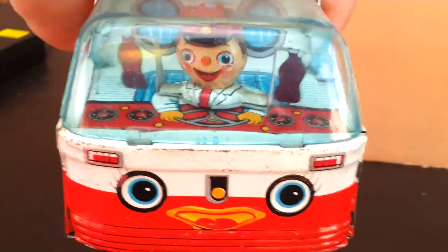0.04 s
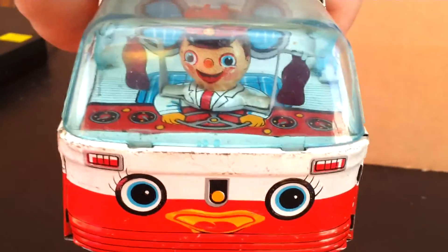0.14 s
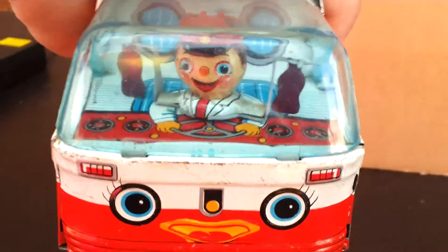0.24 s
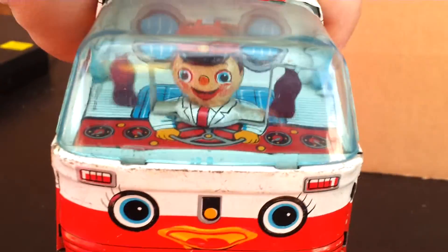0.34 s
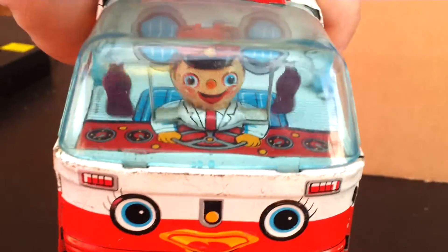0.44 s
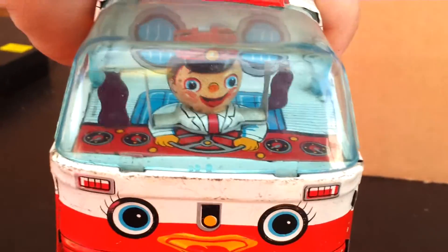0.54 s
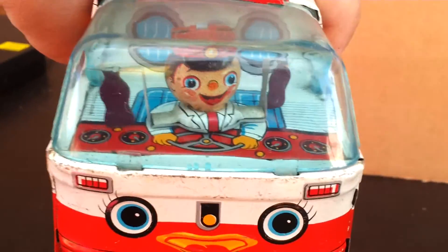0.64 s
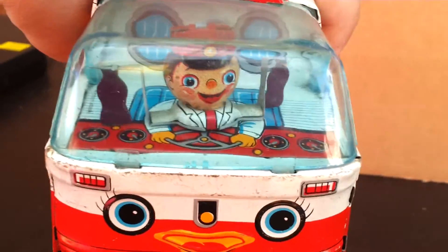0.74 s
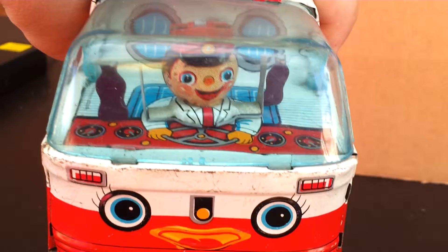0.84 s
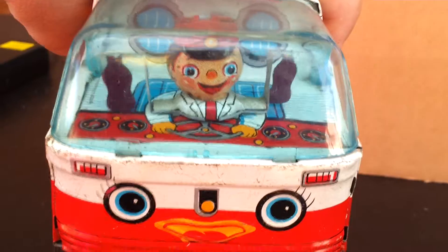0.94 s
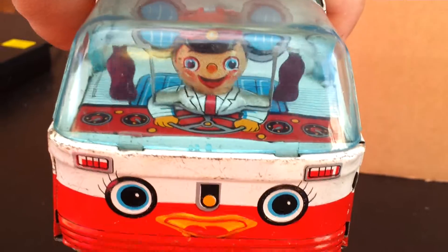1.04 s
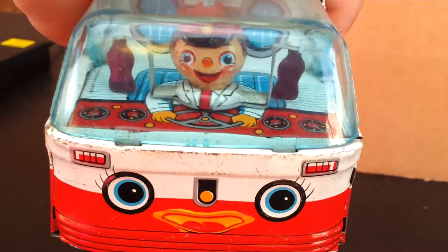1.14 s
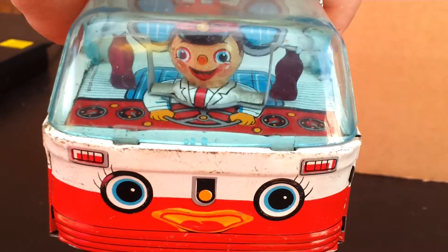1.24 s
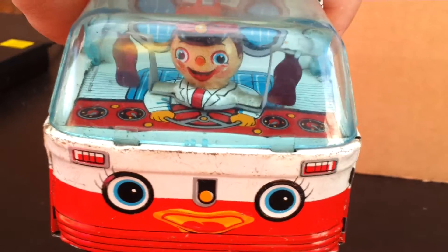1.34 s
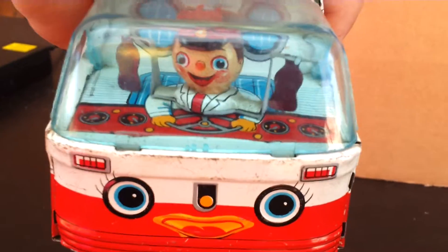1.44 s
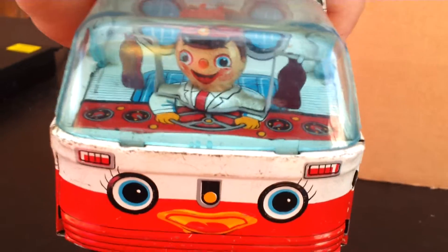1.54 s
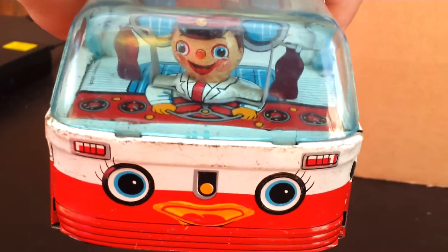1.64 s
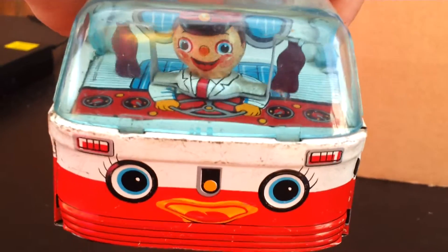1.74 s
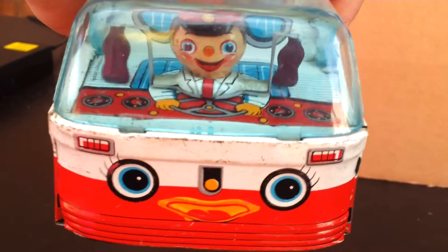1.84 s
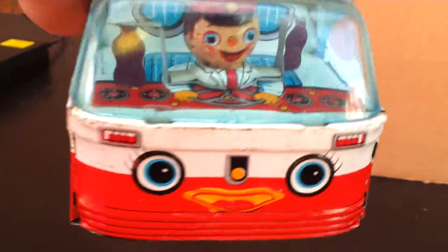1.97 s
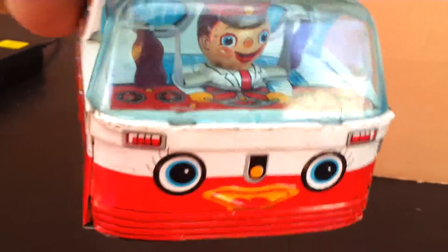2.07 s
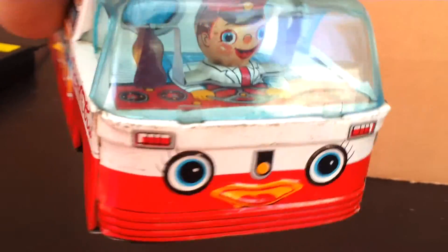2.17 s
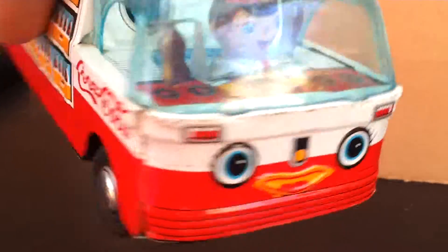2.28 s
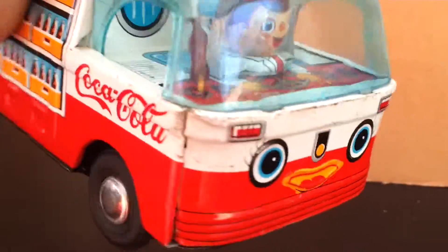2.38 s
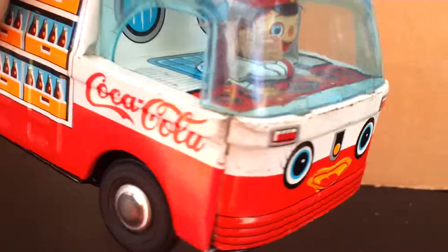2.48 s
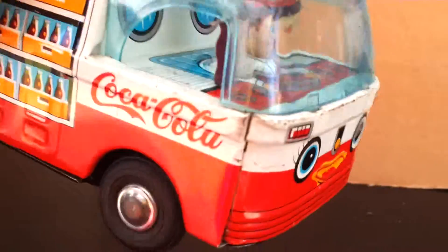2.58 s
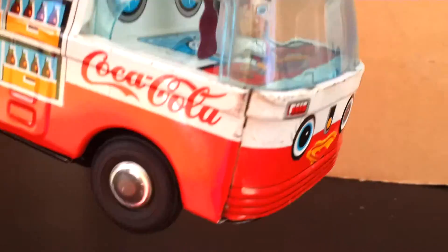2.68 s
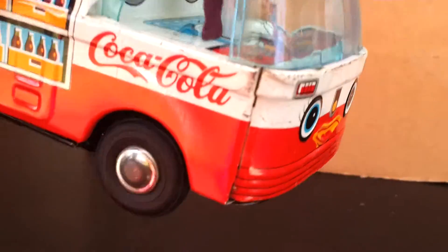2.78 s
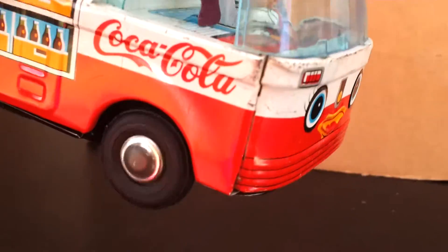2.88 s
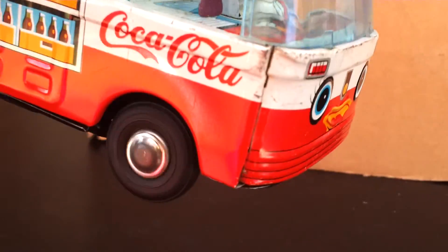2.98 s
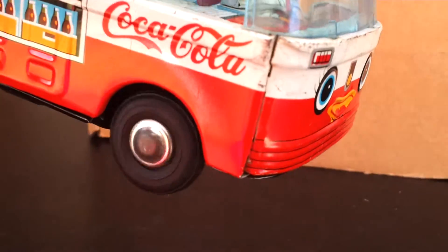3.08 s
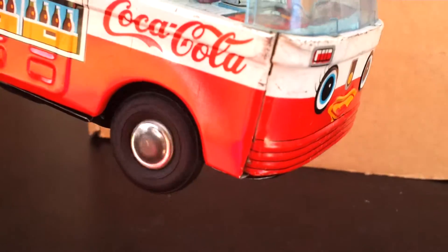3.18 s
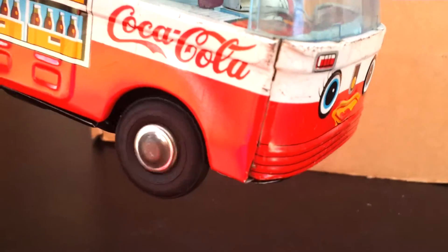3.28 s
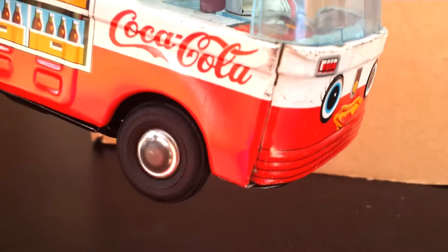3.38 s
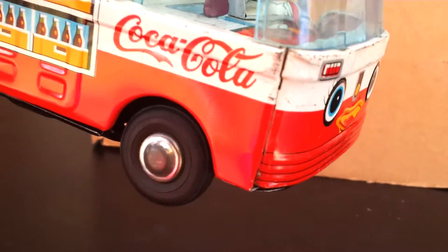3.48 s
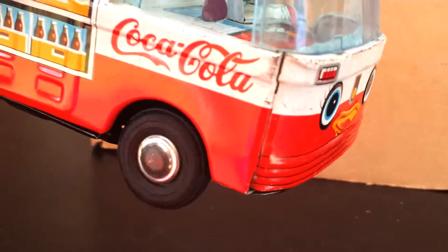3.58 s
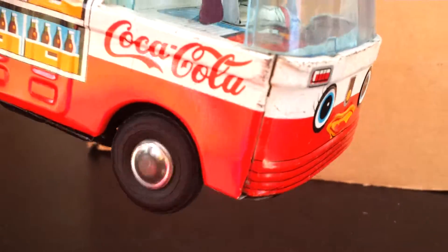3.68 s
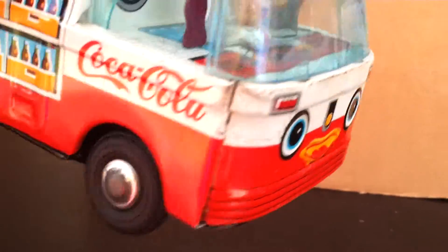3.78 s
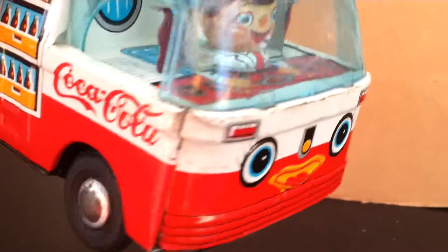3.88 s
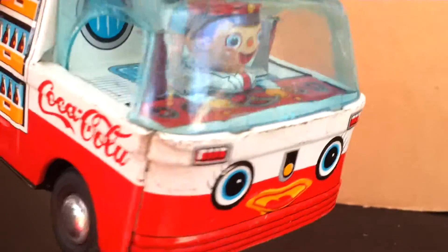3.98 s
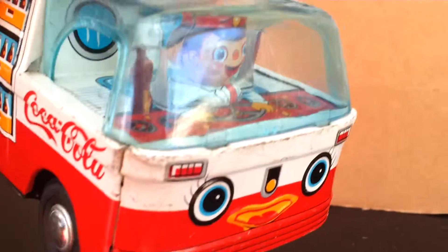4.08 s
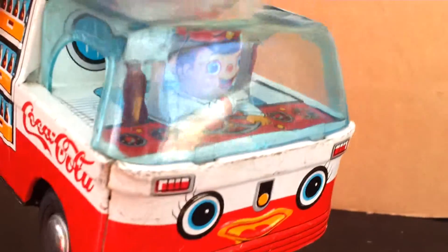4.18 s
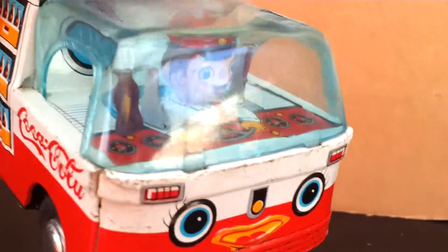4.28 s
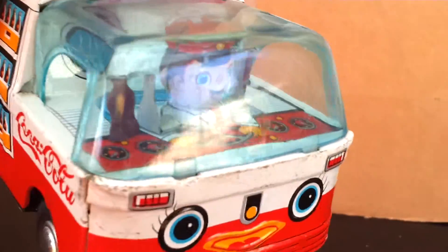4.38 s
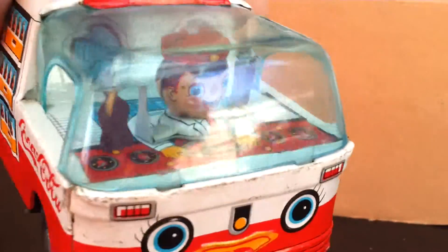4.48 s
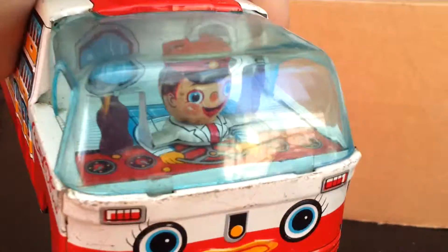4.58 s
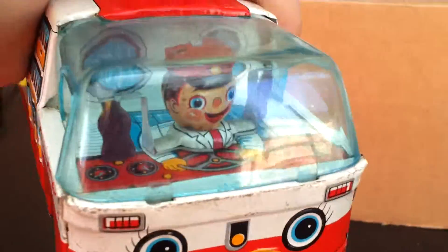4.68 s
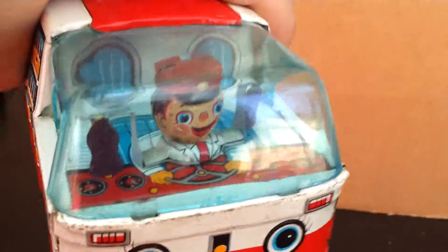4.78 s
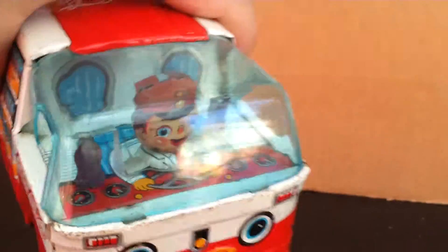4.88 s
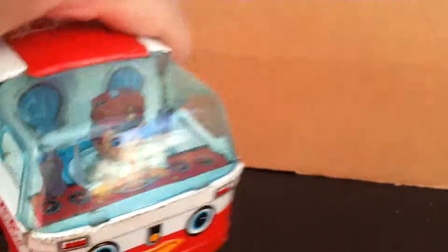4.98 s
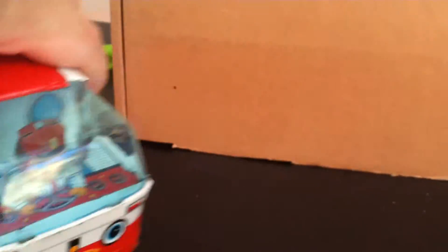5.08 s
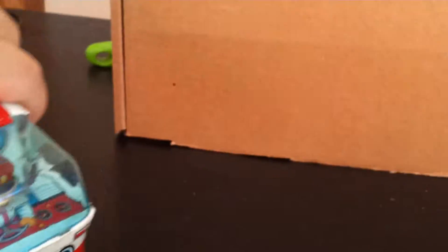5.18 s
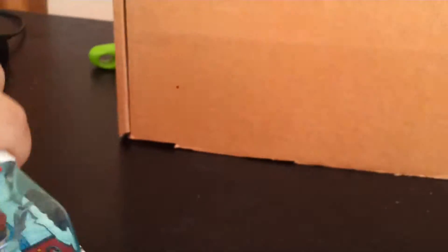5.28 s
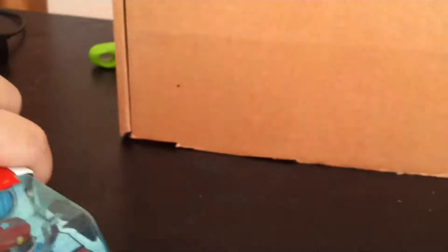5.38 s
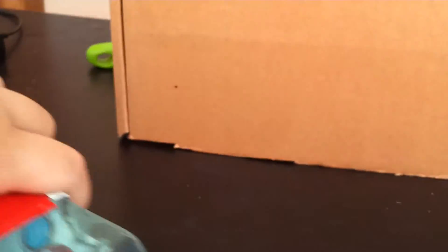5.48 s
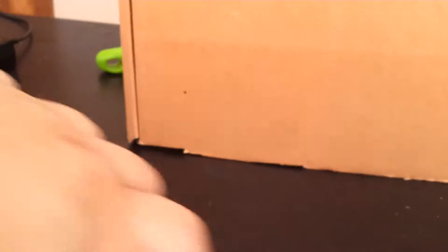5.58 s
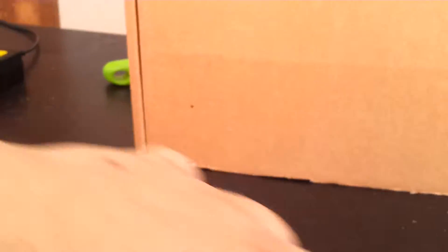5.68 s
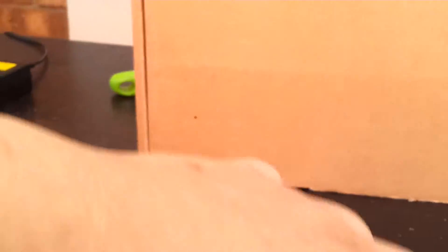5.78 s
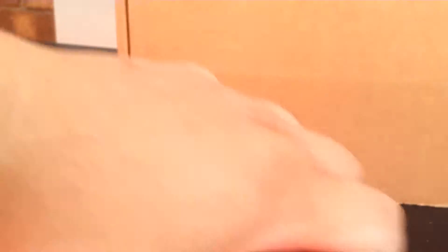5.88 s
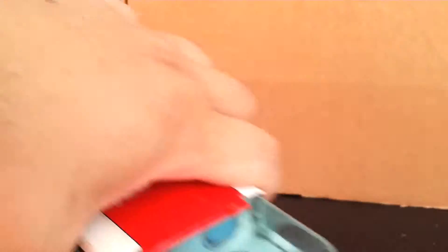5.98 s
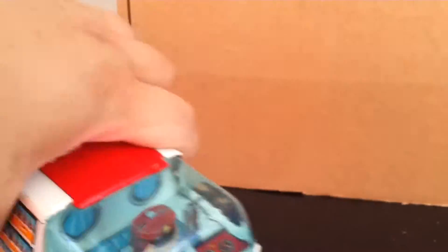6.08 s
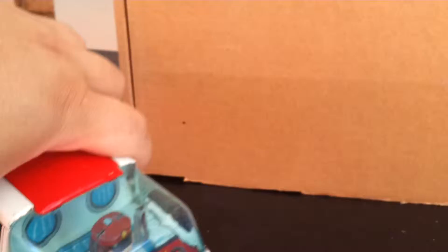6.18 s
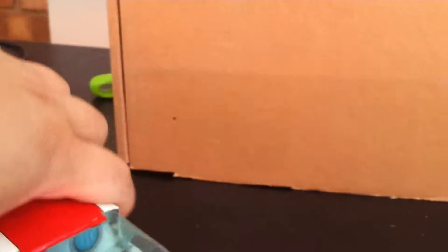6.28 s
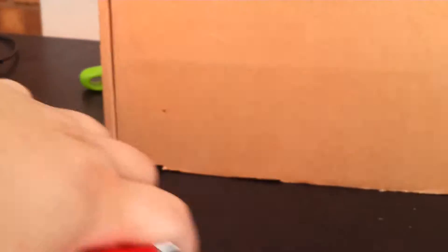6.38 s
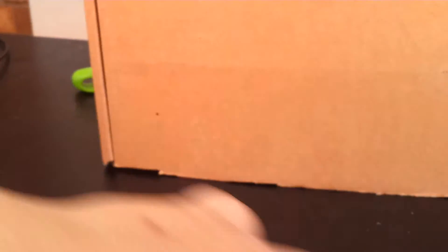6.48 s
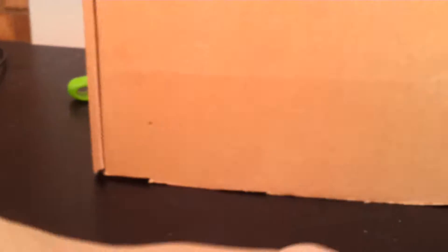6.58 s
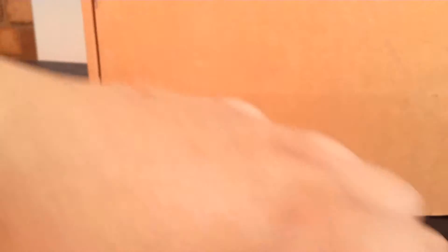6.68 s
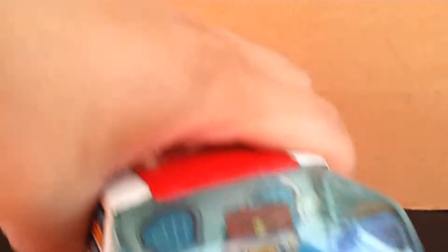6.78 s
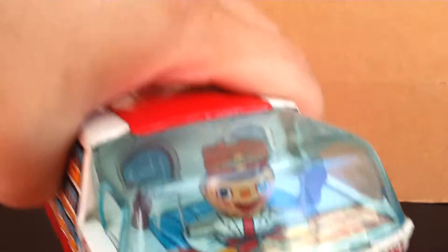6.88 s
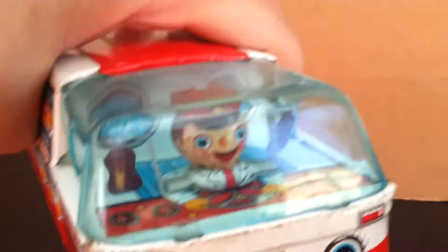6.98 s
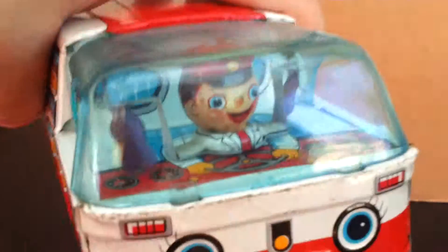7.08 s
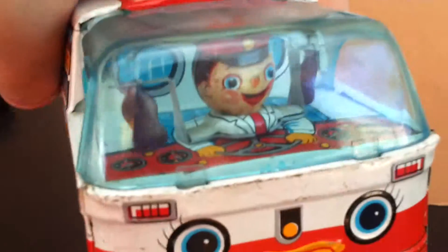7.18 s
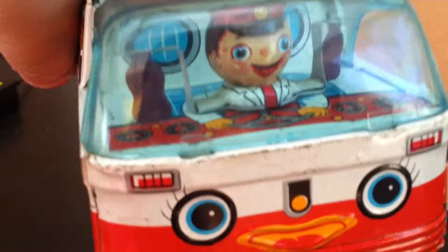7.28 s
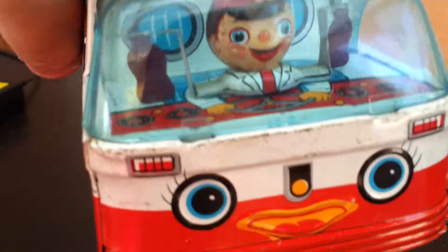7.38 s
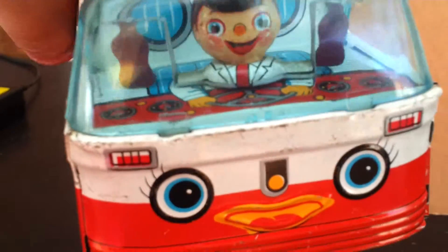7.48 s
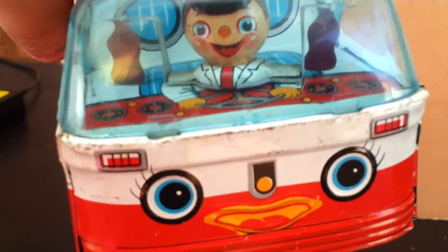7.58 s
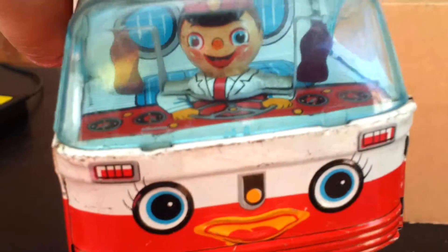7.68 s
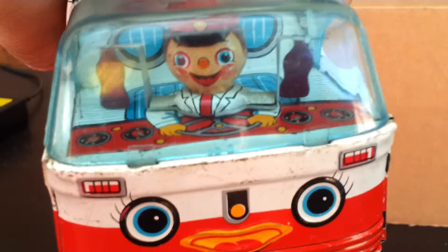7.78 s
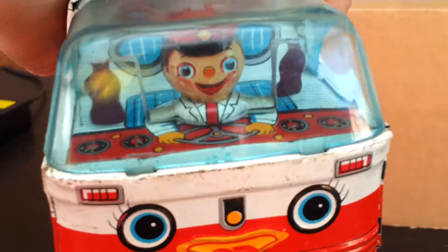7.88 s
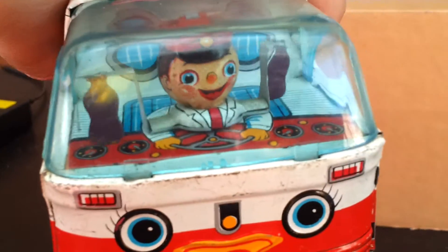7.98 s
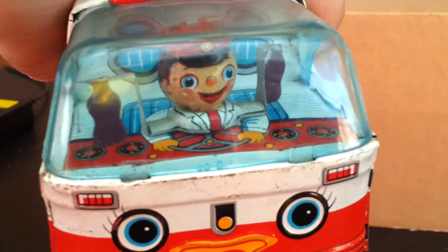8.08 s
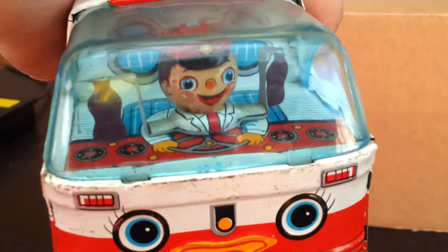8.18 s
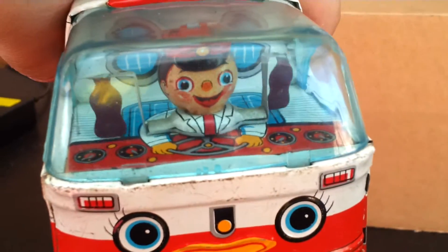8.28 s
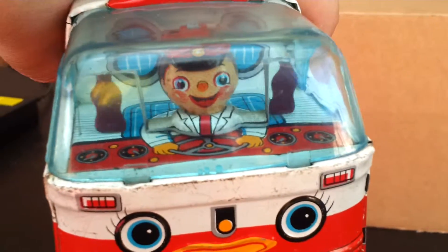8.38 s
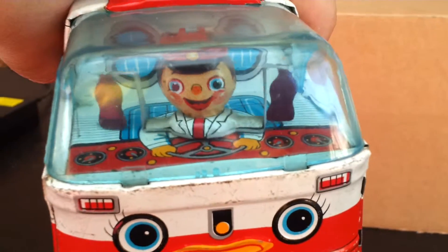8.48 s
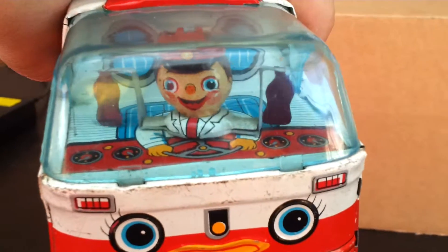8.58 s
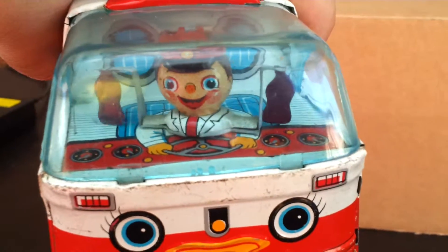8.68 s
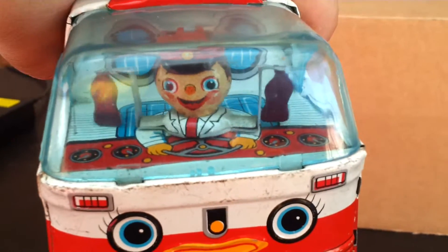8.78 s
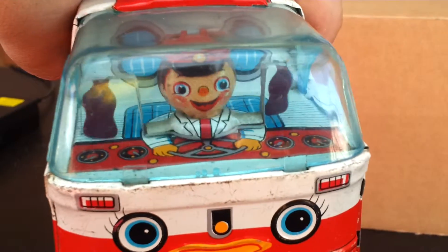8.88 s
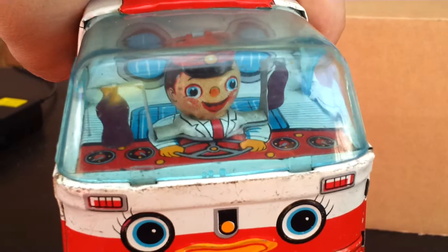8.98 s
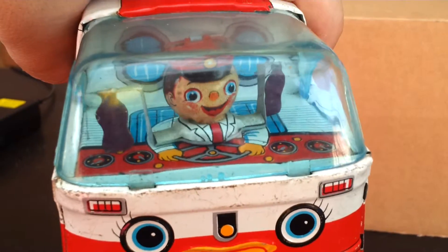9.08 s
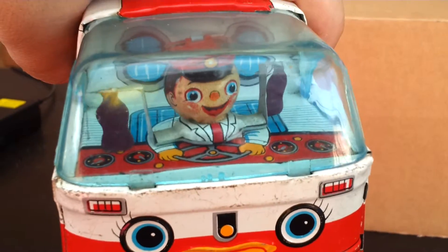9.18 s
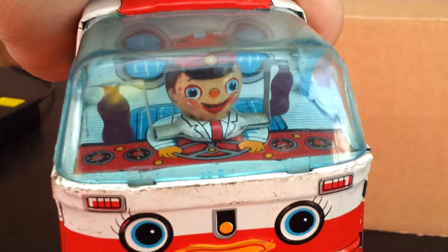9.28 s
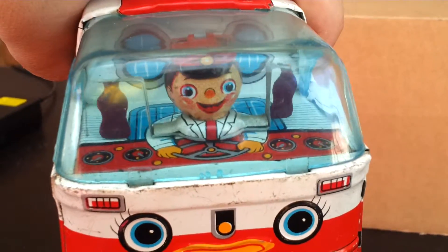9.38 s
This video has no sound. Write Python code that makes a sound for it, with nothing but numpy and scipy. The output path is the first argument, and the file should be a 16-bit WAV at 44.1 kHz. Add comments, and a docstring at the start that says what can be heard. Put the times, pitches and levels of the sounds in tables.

```python
"""Loose gear teeth chatter into the sheet-metal body of a tin toy truck, held up while its flywheel coasts.
Random tooth strikes excite noise bursts, filtered by the modes of whichever face is turned to the microphones.
Twice the truck is set on a table and pushed up to speed: gear mesh tones glide upward, the chatter swells with each
scrape, and decaying modes with a noise crack sound as the wheels knock the table; narrow-band noise screeches in
the first push. Dense random reflections and bursts of gated low noise lie behind."""
import sys
import numpy as np
from scipy import signal
from scipy.fft import rfft, irfft
from scipy.io import wavfile
from scipy.ndimage import uniform_filter1d

SR = 44100
rng = np.random.default_rng(int(sys.argv[2]) if len(sys.argv) > 2 else 0)


def waveform_to_disk(signal):
    """Save audio, clipped to [-1, 1], as 16-bit WAV at the path in sys.argv[1]."""
    frames = np.transpose(np.atleast_2d(signal))
    scaled = np.clip(frames, -1, 1) * 32767
    samples = np.round(scaled).astype(np.int16)
    wavfile.write(sys.argv[1], SR, samples)


def amplitude_ratio(level_db):
    """Convert a level in decibels to the matching linear amplitude (field) ratio."""
    exponent = np.asarray(level_db, float) / 20
    return 10 ** exponent


N = 416304

# where the truck is held: (time [s], left minus right on top of the microphones' lean [dB], treble change [dB])
PLACE = [(0.0, -2.3, -1.5), (3.63, -1.6, 0), (4.05, -2.7, -2.5), (4.41, -1.3, -1), (4.9, -2.3, -0.5),
         (5.36, -1.8, -4.5), (5.81, -0.3, 0), (6.42, -1.8, -2), (6.7, 1.5, -2.5), (6.94, -1.2, -1),
         (7.6, -2, 0), (9.44, -1.1, -0.5)]


def gears():
    """Source-filter principle: tooth strikes excite the modes of the body face turned to the microphones."""
    # face turned to the microphones: (from time [s], pose [0 front, 1 flank, 2 pressed down far left,
    # 3 roof, 4 front and close, 5 pressed down nearer])
    poses = [(0, 0), (2.15, 1), (5.35, 2), (5.7, 3), (6.32, 5), (6.6, 3), (6.95, 4)]
    # broad colour of the body: (frequency [Hz], relative density in poses 0 to 5 [dB per Hz, six columns])
    face_colours = [(270, -66, -57, -53, -59, -62, -60), (340, -31, -22, -18, -24, -27, -25),
                    (520, -24, -19, -15, -14, -22, -23), (1170, -15, -13, -12, -10, -13, -8),
                    (1650, -7, -5, -16, -8, -4, -14), (2330, -10, -8, -10, -5, -10, -8),
                    (2900, -10, -7, -10, -5, -5, -5), (3500, -6, -8, -11, -5, -8, -7),
                    (5600, -10, -5, -7, -5, -7, -4), (6100, -13, -12, -11, -9, -12, -8),
                    (9000, -14, -12, -12, -11, -13, -12), (14200, -18, -17, -15, -16, -18, -11),
                    (14500, -22, -21, -19, -20, -22, -15), (14900, -63, -62, -60, -61, -63, -56)]
    # body modes: (frequency [Hz], half width to 1/e of the lift [Hz], lift in poses 0 to 5 [dB, six columns])
    tin_modes = [(414, 25, 3.5, 7, 6, 11, 14, 13.5), (639, 63, 5.5, 6, 10, 7.5, 5.5, 17),
                 (775, 43.3, 6, 7.5, -3, 1.5, 9, 10), (883, 75, 7.5, 6, 4, 8, 7, 2),
                 (1320, 81, 7, 3, 11, 2, 9, -3), (1454, 105, 8.5, 7, -4, 2.5, 7, 4.5),
                 (1859, 76, 9, 2, 6, 7, 2.5, 10), (2097, 137, 6, 2, 0, 4, 6.5, 0),
                 (2574, 106, 5, 2.5, 0, 2.5, 5.5, -1), (3220, 126, 4.5, 4, 0, -1, 4, 7),
                 (3704, 125, 2, 2, 3, 3.5, 5, 8), (3970, 114, 2.5, 3, 7.5, 1, 6.5, -1),
                 (4274, 104, 2, 4.5, 7, 2.5, 6, 8), (4464, 120, 1.5, 1, -9, -1, 3, 0),
                 (4760, 280, 6, 5.5, 4, 1.5, 3.5, 3), (5316, 140, 6.5, -0.5, 3, -3, 2.5, 1),
                 (6620, 180, 4, -4, -4, -4, 3, 4), (6940, 450, 1.5, 2.5, 3, 1, 1, 1),
                 (7840, 160, 6.5, 5, 7, 3, 1.5, 9), (8090, 89, -0.5, 2.5, 3, 2, 5, 2),
                 (10030, 430, 4, 1.5, 2.5, 0.5, 1, 2), (11540, 950, 2.5, 2.5, 5, 1, 2, 7)]
    time = np.arange(N) / SR
    strikes = teeth(np.sqrt(chatter()), strikes_per_s=90 * flywheel(time))  # 90 strikes per turn
    hz = np.fft.rfftfreq(4096, 1 / SR)
    start, face = np.transpose(poses)
    pose = face[np.searchsorted(start, time, "right") - 1]
    faces = np.array(face_colours)
    body = np.zeros((2, N))
    for k in range(faces.shape[1] - 1):
        lift_db = sum(mode[2 + k] * np.exp(-((hz - mode[0]) / mode[1]) ** 2) for mode in tin_modes)
        # equal-power fade from one face into the next
        seen = np.sqrt(abs(uniform_filter1d(1. * (pose == k), size=3000)))
        body += seen * colour(strikes, read(faces[:, [0, k + 1]], hz) + lift_db)
    treble = signal.sosfilt(signal.butter(2, 5800, "high", fs=SR, output="sos"), body)
    low = signal.sosfiltfilt(signal.butter(2, 480, fs=SR, output="sos"), body)
    treble_gain = amplitude_ratio(along(PLACE)[1])
    # gain below 480 Hz switches at random between near full and about 20 dB down
    low_gain = amplitude_ratio(9.8 * np.tanh(2 * wander(11.4)) - 10)
    return body + (treble_gain - 1) * treble + (low_gain - 1) * low


def teeth(strength, strikes_per_s):
    """Impulsive excitation: random uneven strikes set tin patches fizzing in decaying noise, over steady rubbing."""
    spread_db, fizz_t60_s, rubbing, patches = 3.0, 0.024, 0.53, 23
    size = amplitude_ratio(spread_db * np.minimum(rng.exponential(1, N), 4))
    size = size * (rng.random(N) < strikes_per_s / SR) / np.sqrt(strikes_per_s)
    size = evened(size) * strength
    # the group of busy patches moves on steadily, so the colour drifts
    patch = (np.arange(N) / SR * 7.0 + 6.0 * rng.random(N)).astype(int) % patches
    t = np.arange(1400) / SR
    fizz = rng.standard_normal((patches, 2, len(t))) * amplitude_ratio(-60 * t / fizz_t60_s)  # unlike left and right
    fizz /= np.linalg.norm(fizz, axis=2, keepdims=True)
    struck = np.zeros((2, N))
    for k in range(patches):
        struck += signal.oaconvolve((size * (patch == k))[None], fizz[k], axes=1)[:, :N]
    return struck + rubbing * strength * rng.standard_normal((2, N))


def chatter():
    """Incoherent addition: the powers of the slow chatter, the catches of slack gears and the scrapes are summed."""
    # slow chatter as the flywheel coasts and the truck is turned, braked and pushed: (time [s], relative level [dB])
    grind = [(0.0, -24.5), (0.1, -22), (0.5, -19.5), (0.65, -22), (1.5, -22), (2.08, -23), (2.19, -28.5),
             (2.62, -24.5), (2.75, -26), (3.45, -28.5), (3.53, -24.5), (4.17, -25.5), (4.48, -34.5),
             (4.75, -35), (5.3, -35), (5.45, -34), (5.6, -24.5), (5.8, -22), (6.33, -22.5), (6.4, -41),
             (6.46, -27), (6.58, -28.5), (6.72, -21), (7.6, -18.5), (7.95, -21), (8.15, -20), (9.0, -20),
             (9.2, -22), (9.44, -20.5)]
    # slack gears catching: (time [s], relative level before the catch's rise and decay [dB])
    rattles = [(0.0368, -34), (0.442, -12), (0.5237, -14), (0.8066, -23), (0.8764, -13), (1.0311, -17),
               (1.1274, -11), (1.1706, -10), (1.275, -16), (1.3628, -21), (1.499, -12), (1.8, -13),
               (1.9485, -11.5), (2.021, -14), (2.438, -17), (2.59, -17), (2.9677, -21), (3.2926, -16),
               (3.5149, -22), (3.5992, -32), (3.6775, -27), (3.836, -13.5), (3.942, -13), (4.0153, -15),
               (4.12, -24), (4.432, -29), (4.5114, -24), (4.6376, -29), (4.7239, -27), (4.7578, -33),
               (4.8, -23.5), (4.8516, -31), (4.8875, -28), (4.945, -26), (4.986, -26), (5.0621, -24),
               (5.239, -26), (5.275, -27.5), (5.4647, -14), (5.78, -18), (5.8896, -13), (5.9635, -14),
               (6.6294, -11.5), (6.6808, -19), (6.986, -12.5), (7.1038, -12.5), (7.7953, -17),
               (8.1879, -23), (8.9247, -12)]
    # wheels scraping the table as they land and are pushed:
    # (start [s], rise [s], hold [s], relative top level [dB], fall [dB per s])
    scrapes = [(5.331, 0.0083, 0.05, -23, 396), (5.447, 0.087, 0.015, -12.5, 63),
               (6.343, .006, 0.02, -15, 200), (6.42, .004, .005, -18, 250),
               (6.466, 0.0089, 0.079, -15.5, 157)]
    power = amplitude_ratio(2 * (along(grind)[0] + throb() + 0.3 * wander(150)))
    t = np.arange(SR // 5) / SR
    catch = amplitude_ratio(-2 * 60 * t / 0.065) * np.minimum(t / 0.004, 1) ** 2  # t60 0.065 s, rise 4 ms
    # lesser catches at random, some 9 per s
    small_db = 1.5 + 2 * rng.standard_normal(N)  # over the chatter
    small = power * amplitude_ratio(2 * small_db) * (rng.random(N) < 9 / SR)
    power = power + abs(signal.oaconvolve(small, catch)[:N])
    for s, db in rattles:
        add(power, s, amplitude_ratio(2 * db) * catch)
    t = np.arange(SR // 2) / SR
    for s, rise, hold, db, fall_db in scrapes:
        falling = amplitude_ratio(2 * (db - fall_db * np.maximum(t - rise - hold, 0)))
        add(power, s, falling * np.minimum(t / rise, 1) ** 3)
    return power


def throb():
    """Amplitude modulation in dB: out-of-round shafts swing the level, more as they slow; brief dips and swells add."""
    # out-of-round shafts: (turns per flywheel turn [ratio], start angle [turns])
    shafts = [(1, -.333), (.68, .094), (.356, .106), (.19, .244)]
    # swing of each shaft at the reference speed: (depth [dB])
    depths_db = [1.5, 1.4, 0.3, 0.64]
    # momentary dips and swells: (time [s], change [dB], half width to 1/e of the change [s])
    lulls = [(.27, -4.5, 0.029), (.71, -3, 0.018), (1.72, -3.5, .02), (1.99, -4.5, 0.027),
             (2.55, -3, 0.021), (2.72, -7, 0.0079), (2.92, -2.5, 0.012), (3.275, -3.5, 0.02),
             (3.915, -3, 0.013), (4.2, -5, 0.0083), (4.59, -1, 0.02), (4.83, 0, 0.008), (4.97, -10, 0.0094),
             (5.22, -2.5, 0.012), (6.166, -2.5, 0.01), (6.7, 0.5, .02), (6.77, 2.5, 0.065),
             (6.94, -3.5, 0.023), (7.23, 3, 0.034), (7.69, 3.5, 0.035), (7.92, 4.5, 0.055),
             (8.03, -1.5, 0.011), (8.17, -4, 0.024)]
    reference_per_s = 7.5  # flywheel turns per s
    t = np.arange(0, N, 32) / SR
    speed = flywheel(t)
    turns = np.cumsum(speed) * t[1]
    swing = 1.3 * wander(39.0)[::32]  # slack in the gear train
    for (ratio, angle), db in zip(shafts, depths_db):
        swing = swing + db * np.cos(2 * np.pi * (ratio * turns + angle))
    brief = sum(db * np.exp(-((t - s) / half_width) ** 2) for s, db, half_width in lulls)
    return np.interp(np.arange(N) / SR, t, swing * np.sqrt(reference_per_s / speed) + brief)


def flywheel(t):
    """Constant deceleration: shaft speed in turns per s at times t, set anew by each push."""
    # flywheel left spinning: (from time [s], speed at that time [turns per s])
    spins = [(0, 26.32), (5.33, 30), (6.55, 38.5)]
    drag_per_s2 = 3.8  # turns per s, lost each second
    start, spin = np.transpose(spins)
    run = np.searchsorted(start, t, "right") - 1
    return spin[run] - drag_per_s2 * (t - start[run])


def whine(rows):
    """Gear mesh as a harmonic series on a gliding fundamental, with random frequency and amplitude modulation."""
    # mesh harmonics 1 to 5: (relative level [dB])
    overtones_db = [0, -5, -3, -3, -5]
    hz = along(rows)[0]
    db = along(rows, -120)[1]
    turns = np.cumsum(hz * (1 + .012 * wander(70))) / SR
    tone = sum(amplitude_ratio(over_db) * np.sin(2 * np.pi * (k + 1) * turns) for k, over_db in enumerate(overtones_db))
    return np.sqrt(2) * uniform_filter1d(amplitude_ratio(db), 300) * amplitude_ratio(3 * wander(45)) * tone


def whines():
    """Superposition of the mesh tones that sweep upward under load."""
    # one list a sweep: (time [s], fundamental [Hz], relative level of the fundamental [dB])
    sweeps = [
        [(5.462, 515, -41), (5.5, 620, -35), (5.53, 780, -33), (5.553, 890, -32), (5.575, 900, -40)],
        [(5.53, 390, -35), (5.56, 480, -35), (5.6, 620, -36), (5.63, 740, -36), (5.665, 895, -32),
         (5.7, 955, -32), (5.735, 940, -38)],
        [(6.44, 655, -42), (6.48, 780, -32), (6.5, 880, -28), (6.54, 1085, -28.5), (6.58, 1210, -35),
         (6.645, 1415, -37)],
    ]
    return sum(whine(rows) for rows in sweeps)


def screech():
    """Quadrature modulation: slow noise on a gliding carrier makes a fuzzy whistle."""
    # tyres and slipping gears under the first push: (time [s], centre frequency [Hz], relative level [dB])
    glide = [(5.465, 4300, -23), (5.51, 4355, -18), (5.56, 4610, -19), (5.63, 4680, -20), (5.68, 4410, -31)]
    hz = along(glide)[0]
    db = along(glide, -120)[1]
    phase = 2 * np.pi * np.cumsum(hz) / SR
    whistle = np.array([wander(220) * np.cos(phase) + wander(200) * np.sin(phase) for side in "LR"])
    return uniform_filter1d(amplitude_ratio(db), 200) * whistle


def knock(db, slow, crack_db):
    """Modal impact: a short cluster of contacts excites table and chassis modes, with a crack of loose tin."""
    # table and chassis modes: (frequency [Hz], relative level [dB], t60 before the knock's own factor [s])
    table_modes = [(395, -7.5, 0.067), (678, -1, 0.045), (940, 2, 0.044), (1316, 11.5, 0.034),
                   (1970, 5, 0.032), (2530, 3, 0.057), (3080, 9, 0.023), (3976, 6, 0.042)]
    t = np.arange(SR // 4) / SR
    ring = sum(amplitude_ratio(mode_db - 60 * t / (t60 * slow)) * np.sin(2 * np.pi * hz * t) for hz, mode_db, t60 in table_modes)
    contacts = rng.standard_normal(180) * np.exp(-np.arange(180) / 30)
    thump = signal.oaconvolve(ring, contacts)[:len(t)]
    crack = amplitude_ratio(crack_db - 60 * t / (0.082 * slow)) * rng.standard_normal((2, len(t)))
    crack = crack * np.minimum(t / 0.0015, 1)
    return amplitude_ratio(db) * (thump / abs(thump).max() + 0.28 * crack)


def knocks():
    """Band-pass filtering: the wheels' blows on the table are kept between 380 Hz and 14.3 kHz."""
    # wheels striking the table: (time [s], relative thump peak [dB], t60 factor [ratio], relative crack level [dB])
    strokes = [(5.342, -10.5, 0.46, -13), (5.545, -14, 0.8, -8), (6.342, -8, 1, 9), (6.412, -3, 0.81, 8.5)]
    blows = np.zeros((2, N))
    for s, db, slow, crack_db in strokes:
        add(blows, s, knock(db, slow, crack_db))
    return signal.sosfilt(signal.butter(4, [380, 14300], "band", fs=SR, output="sos"), blows)


def microphones(pair):
    """Interchannel coherence: two unlike versions become left and right, most alike around 600 to 1400 Hz."""
    # left-right likeness: (frequency [Hz], coherence [0 to 1])
    likeness = [(100, 0.26), (600, 0.88), (1400, 0.89), (2500, 0.11), (5000, 0.04), (12000, 0.068)]
    # difference between the sides: (frequency [Hz], left minus right [dB])
    side_lean = [(60, -19), (180, -8), (550, -3), (1650, 5), (4970, 4.5), (15000, 6.5)]
    lag_s = .00007  # the left microphone is a little farther
    a, b = rfft(pair)
    hz = np.fft.rfftfreq(N, 1 / SR)
    same = np.clip(read(likeness, hz), 0, 1)
    lean = amplitude_ratio(read(side_lean, hz) / 2)
    right = same * a * np.exp(2j * np.pi * hz * lag_s) + np.sqrt(1 - same ** 2) * b
    return irfft(np.array([a * lean, right / lean]), N)


def room(x):
    """Reverberation as a short decaying tail of dense random reflections from the table and walls."""
    t = np.arange(SR // 4) / SR
    taps = rng.choice([-1., 1.], (2, len(t))) * (rng.random((2, len(t))) < .3)
    taps = taps * amplitude_ratio(-60 * t / 0.094) * (t > .003)
    return signal.oaconvolve(x, taps / np.linalg.norm(taps[0]), axes=1)[:, :N]


def low_bursts():
    """Gated low-pass noise, independent left and right; its deep and upper parts flicker apart."""
    # bursts of low noise: (start [s], length before softening [s], level [dB])
    bursts = [(1.78, 0.05, -49), (1.965, 0.053, -48), (2.114, 0.033, -36), (2.182, 0.14, -41.5),
              (2.351, 0.13, -35.5), (2.522, 0.16, -37.5), (2.684, .21, -46.5), (3.038, 0.15, -48),
              (3.218, 0.15, -58.5), (3.423, 0.03, -44), (3.55, .045, -49), (3.69, 0.04, -55),
              (3.78, 0.032, -51), (3.886, 0.044, -60), (4.198, 0.098, -56), (4.367, 0.056, -56),
              (4.475, .045, -51), (4.59, 0.19, -49), (4.813, 0.064, -52), (5.0, 0.22, -51.5),
              (5.32, 0.05, -46), (5.427, .24, -60), (6.34, 0.045, -44), (6.408, 0.032, -33),
              (6.436, 0.084, -54)]
    # spectrum of the bursts: (frequency [Hz], relative density [dB per Hz])
    burst_colour = [(12, -65), (20, -30), (48, -15.5), (156, -1.5), (194, -4.5), (237, 0.5), (320, -7),
                    (420, -5), (700, -120)]
    hz = np.fft.rfftfreq(4096, 1 / SR)
    noise = evened(colour(rng.standard_normal((2, N)), read(burst_colour, hz)))
    deep = signal.sosfiltfilt(signal.butter(3, 130, fs=SR, output="sos"), noise)
    gate = np.zeros(N)
    for s, length, db in bursts:
        add(gate, s, amplitude_ratio(db) * np.ones(round(length * SR)))
    edge = np.hanning(round(.03 * SR))  # 30 ms window softens the edges
    lumpy = amplitude_ratio(5 * wander(20)) * deep + amplitude_ratio(5 * wander(20)) * (noise - deep)
    return signal.oaconvolve(gate, edge / edge.sum(), "same") * evened(lumpy)


def evened(x):
    """Normalization to an rms of 1."""
    return x / np.sqrt(np.mean(x ** 2) + 1e-20)


def read(points, hz):
    """Linear interpolation of a spectrum on a log-frequency axis."""
    f, value = np.transpose(points)
    return np.interp(np.log(hz + 1), np.log(f + 1), value)


def along(rows, outside=None):
    """Linear interpolation in time: the columns of a curve at every sample."""
    s, *columns = np.transpose(rows)
    return [np.interp(np.arange(N) / SR, s, c, outside, outside) for c in columns]


def add(mix, s, sound):
    """Superposition: mixes a sound in, in place, from time s."""
    part = mix[..., round(s * SR):][..., :sound.shape[-1]]
    part += sound[..., :part.shape[-1]]


def colour(x, db):
    """Minimum-phase filter of unit energy, its phase the Hilbert transform of a log gain on a 4096-point grid."""
    log_gain = np.log(amplitude_ratio(np.maximum(np.r_[db, db[-2:0:-1]], -100)))
    taps = np.fft.ifft(np.exp(np.conj(signal.hilbert(log_gain)))).real
    return signal.oaconvolve(x, taps[None] / np.linalg.norm(taps), axes=1)[:, :N]


def wander(hz):
    """Low-passed white noise of rms 1: a random fluctuation up to about hz."""
    return evened(signal.sosfilt(signal.butter(2, hz, fs=SR, output="sos"), rng.standard_normal(N)))


def scene():
    """Superposition of the truck as the microphones hear it, its reflections and the bursts of low noise."""
    sources = gears() + screech() + whines() + amplitude_ratio(5.0) * knocks()
    toy = microphones(sources) * amplitude_ratio(1.5)
    toy = toy * amplitude_ratio(np.outer([.5, -.5], along(PLACE)[0]))  # level difference between the sides
    return toy + amplitude_ratio(-8) * room(toy) + low_bursts()


def top_cut(x):
    """Nothing passes above the cut-off."""
    return signal.sosfilt(signal.butter(12, 15630, fs=SR, output="sos"), x)


def record(dry):
    """Hard clipping: peaks beyond full scale are flattened."""
    finished = np.clip(dry, -1, 1)
    return top_cut(finished)


dry = scene()
out = record(dry)
waveform_to_disk(out)
```